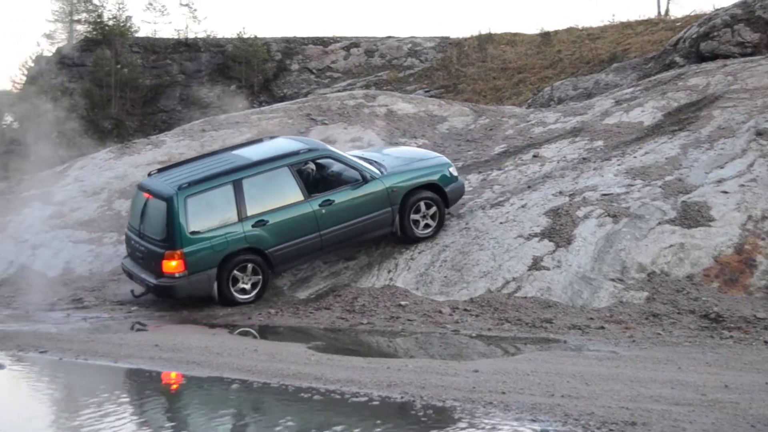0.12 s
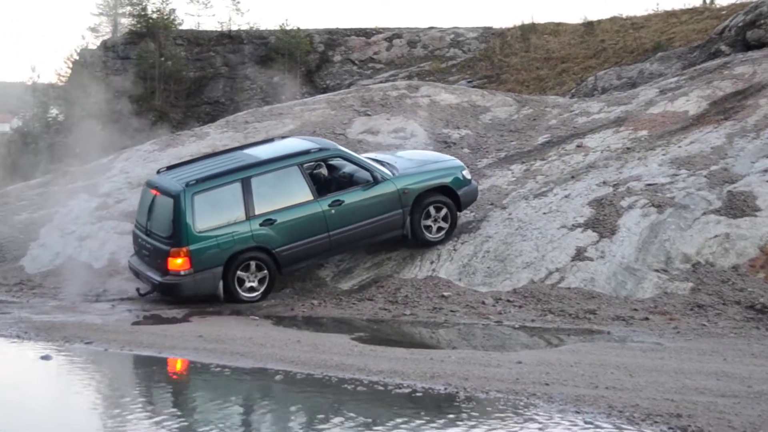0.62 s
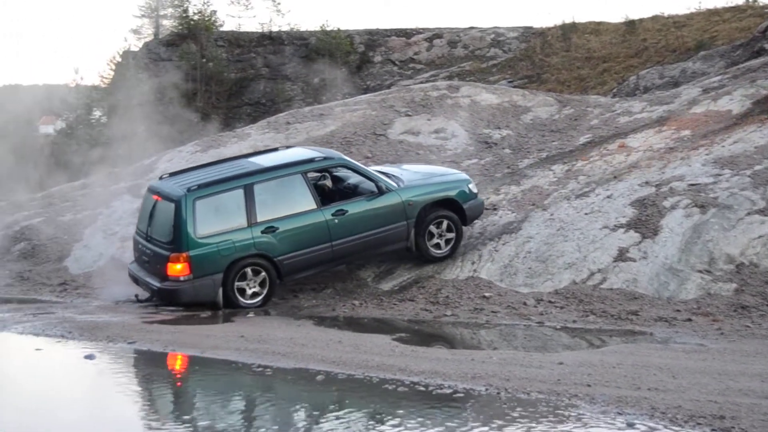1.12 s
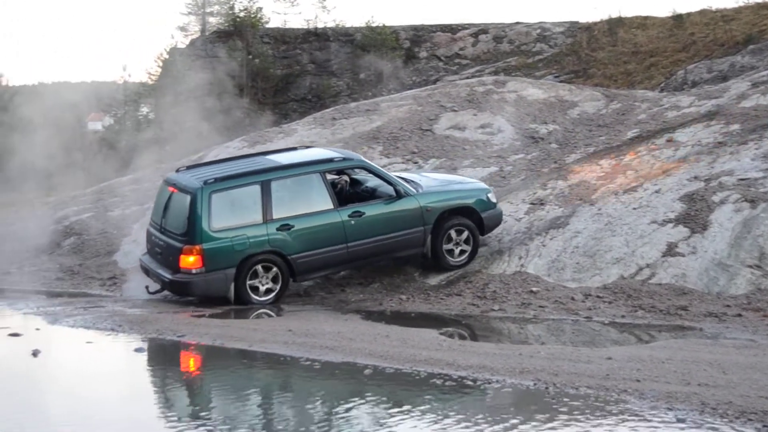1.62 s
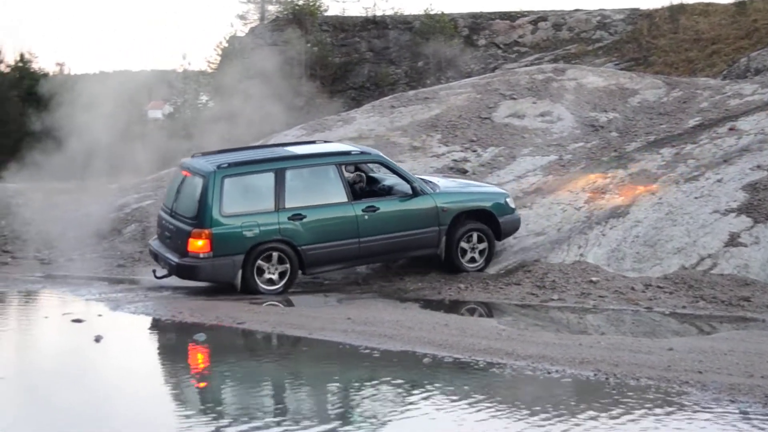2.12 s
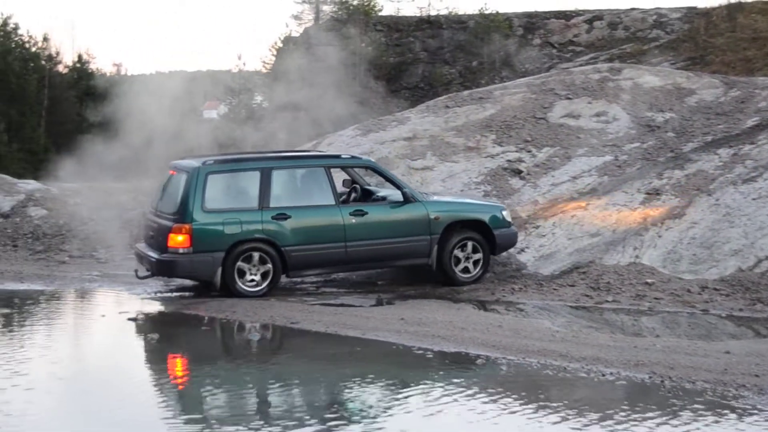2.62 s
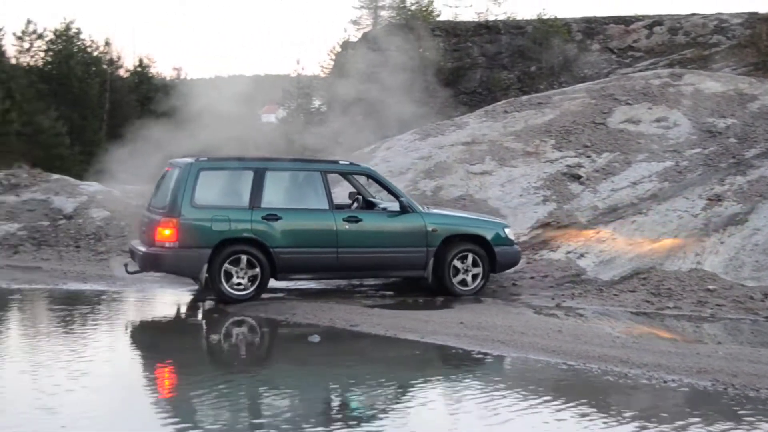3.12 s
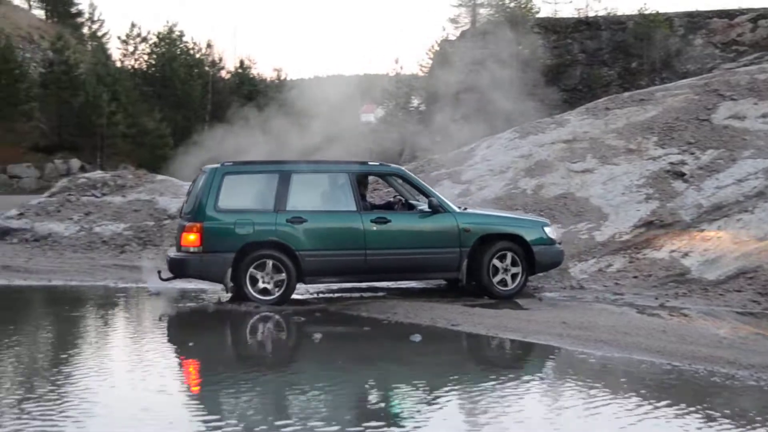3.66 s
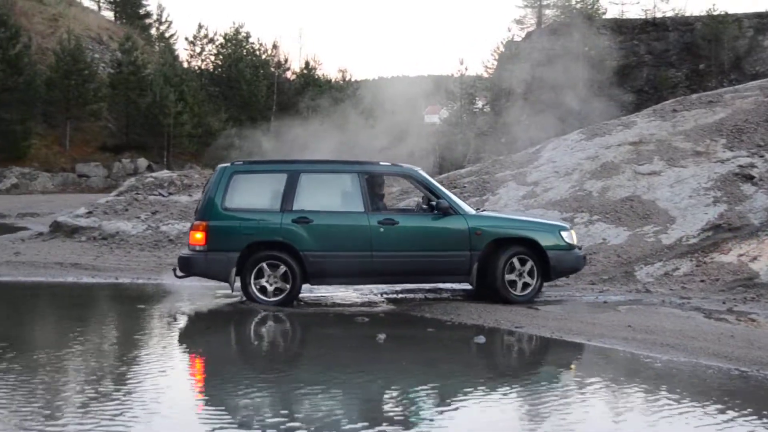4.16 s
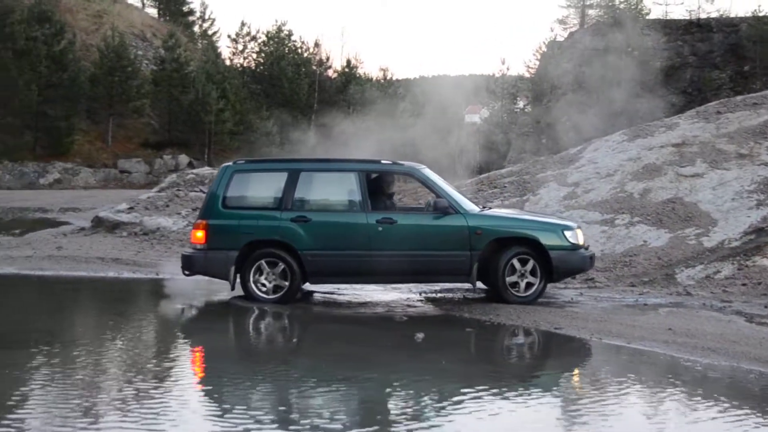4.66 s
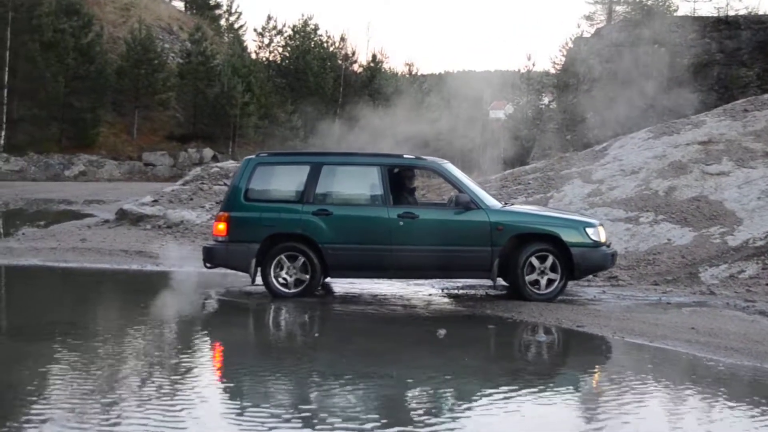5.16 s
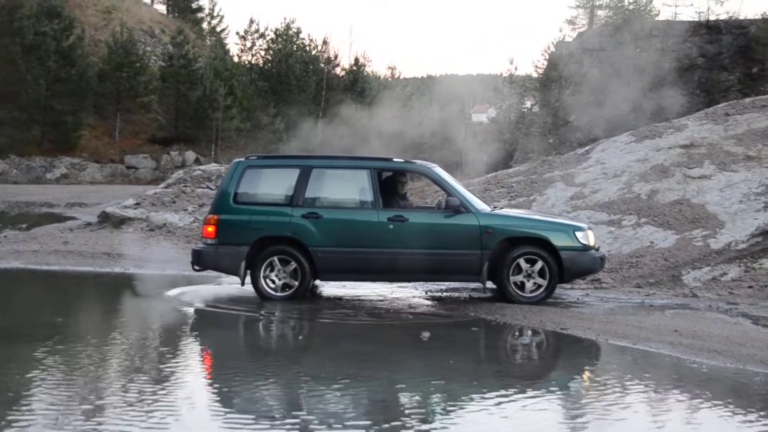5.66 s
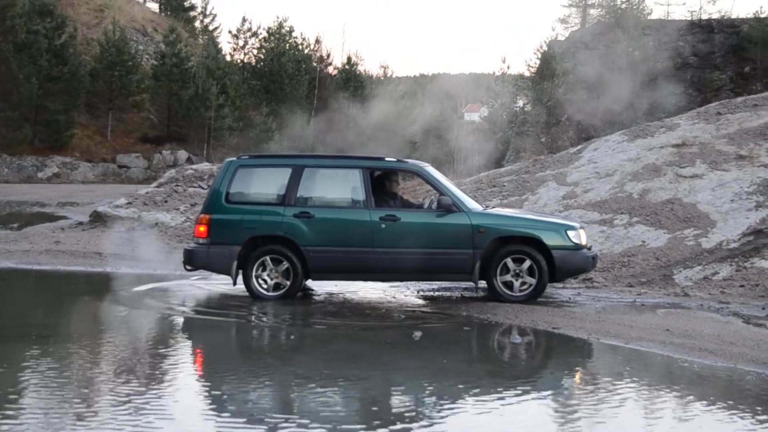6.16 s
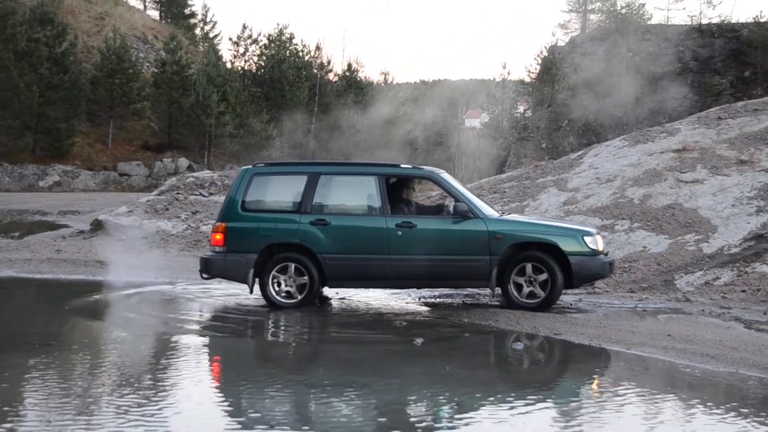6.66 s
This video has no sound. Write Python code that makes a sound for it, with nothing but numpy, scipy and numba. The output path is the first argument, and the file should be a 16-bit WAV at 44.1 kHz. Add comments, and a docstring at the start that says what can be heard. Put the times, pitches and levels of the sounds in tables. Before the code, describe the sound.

A car slides off a rock slope with rasping grit and popping stones, rolls quietly over wet gravel, and finally its engine climbs in pitch.

```python
"""Rock slope and wet gravel: a car slides off with locked wheels and rolls on over the gravel; its engine revs up.
Random contacts feed stone crunch, grit scrape and sand hiss; damped rings make snapping stones, ticks and bumps.
The engine sums exhaust tones, pipe noise, block clatter and gear whine; a panel drones early in the revs.
A rock face adds a short noise-tail echo; a small microphone narrows the band."""
import sys
import numpy as np
from scipy import signal
from scipy.fft import rfft, irfft
from scipy.io import wavfile
from scipy.ndimage import uniform_filter1d
from numba import njit

SR = 44100
rng = np.random.default_rng(int(sys.argv[2]) if len(sys.argv) > 2 else 0)


def pcm_store(signal):
    """Save signal as 16-bit PCM."""
    levels = np.round(np.clip(np.atleast_2d(signal), -1, 1) * 32767)
    wavfile.write(sys.argv[1], SR, levels.astype(np.int16).T)


def amplitude_ratio(level_db):
    """Convert a level in decibels to the matching linear amplitude (field) ratio."""
    exponent = np.asarray(level_db, float) / 20
    return 10 ** exponent


N = 298998

# tyres rolling over gravel; coarseness = stones over scraping grit: [t/s, level/dB, coarseness/dB]
ROLLING = [(0, -40, 14.5), (0.4, -41.5, 1), (0.64, -40, 0), (0.77, -38, -4.5), (1.45, -46, 6.5),
           (1.55, -46, -1.5), (1.72, -48, 1.5), (1.82, -49.5, 0), (2.1, -48.5, 2.5), (2.43, -45.5, -0.5),
           (2.55, -45, 2.5), (2.7, -41, -2.5), (2.87, -45, -4), (3.21, -44.5, -1.5), (3.36, -45.5, -2.5),
           (3.98, -46.5, 0), (4.12, -48, -6), (4.2, -53, 2), (4.5, -53, -1), (4.66, -46.5, -6),
           (4.8, -51, -3.5), (4.93, -54.5, -5.5), (5.12, -59.5, -0.5), (5.3, -52, -14), (5.49, -53.5, -5),
           (5.65, -54.5, -4), (5.89, -55, 1.5), (6.18, -47, -3), (6.42, -45.5, 0), (6.78, -46.5, -2)]
# locked-wheel slides, one table each: [t/s, level/dB, coarseness/dB, sand spray/dB, scrape f/Hz]
SLIDES = [
    [(0, -25, 6.5, 1, 1870), (0.02, -28, 10.5, 0.5, 1820), (0.04, -23.5, 8.5, -6, 1950),
     (0.052, -26.5, 4.5, -8, 1900), (0.06, -31, 14, 1, 1830), (0.075, -31.5, 11.5, 2.5, 1870),
     (0.115, -28.5, 7.5, -1, 1700), (0.15, -28.5, 8, -0.5, 1800), (0.195, -32, 5.5, 4.5, 2060),
     (0.212, -44, 4, 0, 2050), (0.225, -50, -1, -7, 2050)],
    [(0.78, -40.5, -4, -3.5, 2210), (0.83, -25.5, 1, 2, 2150), (0.87, -28, -0.5, 2, 2540),
     (0.94, -28.5, -2.5, 0.5, 2580), (1.0, -26.5, -1.5, -2, 2600), (1.15, -30.5, 0.5, 1, 2800),
     (1.23, -34, 6, 5, 3030), (1.275, -33.5, 7.5, 2.5, 3040), (1.305, -34, 3.5, 4.5, 3120),
     (1.35, -32, 1.5, 3, 3140), (1.375, -37, -4, 3, 2970), (1.392, -62, -2, 3, 2700)],
]
# short patches of loose ground: [t/s, level/dB, length/s, coarseness/dB, sand spray/dB]
LOOSE_PATCHES = [(0.272, -37, 0.04, 0, -3), (0.474, -45.5, 0.085, 7, 8), (0.656, -41.5, 0.086, -2, -0.5),
                 (1.472, -44, 0.09, -12, 1.5), (1.727, -50, 0.06, 5.5, 4.5), (1.924, -45.5, 0.066, 5, 5),
                 (2.067, -46, 0.0095, -1, 2), (2.447, -60, 0.26, -3, 13), (2.553, -45, 0.11, 0.5, 5),
                 (3.3, -53.5, 0.036, 0, 13), (3.722, -50.5, 0.17, -16, 2.5), (4.054, -61, 0.031, 8, 16),
                 (5.28, -57, 0.1, -15, -14), (5.547, -50.5, 0.37, -3, -12), (5.59, -59, .05, -1, -18),
                 (5.862, -51, 0.37, -19, -19), (6.193, -64, 0.07, 0, 2)]
# spectra of stones, of sand, and of body and road: [f/Hz, density/dB per Hz]
CRUNCH_COLOUR = [(200, -37), (430, -17), (540, -8), (630, -12.5), (780, -1.5), (1000, 0), (1200, -3),
                 (1500, -7), (2500, -19), (6000, -49)]
SAND_COLOUR = [(800, -29.5), (2000, -7), (3300, 4), (4000, 7), (6000, 1.5), (12000, -4)]
RUMBLE_COLOUR = [(15, -62), (25, -29), (54, -14), (90, -13.5), (150, -4.5), (236, 0.5), (312, 0.5),
                 (418, -6.5), (700, -9), (910, -54), (1540, -120)]
# mean engine speed: [t/s, firing rate/Hz]
FIRING_RATE = [(0, 25), (5.95, 24), (6.05, 31.7), (6.164, 40.4), (6.23, 45.4), (6.362, 55.7), (6.404, 58.9),
               (6.508, 65.0), (6.62, 68.5), (6.78, 70.3)]
# engine load: [t/s, load/0 idle to 1 full]
LOAD = [(0, 0), (1.5, 0), (4.0, 0.2), (4.6, 0.41), (5.95, 0.51), (6.1, 0.69), (6.2, 0.98), (6.27, 0.85),
        (6.38, 0.99), (6.46, 0.95), (6.52, 0.77), (6.7, 0.83), (6.78, 0.91)]
# unequal exhaust branches, one per cylinder: [level/dB]
CYLINDER_DB = [2.5, -1.5, 1, -0.5]
# clean exhaust tones: [multiple of firing rate, level/dB]
EXHAUST_TONES = [(1, 6), (2, 4), (1.5, -8), (2.5, -18), (3, 1.5), (3.5, -3), (4, 0.5), (4.25, -2.5),
                 (5, -1.5), (6, -3), (7, -2), (8, -2), (9, -5.5), (10, -5.5), (11, -7.5)]
# exhaust pipe resonances: [f/Hz, width/Hz, level/dB]
PIPE_MODES = [(232, 30, -2), (299, 53, -5.5), (332, 20, -4), (590, 42, -6.5)]
# block clatter spectrum: [f/Hz, density/dB per Hz]
CLATTER_COLOUR = [(300, -20), (500, -12), (900, -6), (1500, -23), (2500, -7), (4000, 2), (9000, -24)]
# engine block and cover resonances: [f/Hz, width/Hz, level/dB]
BLOCK_MODES = [(870, 18, 0), (1250, 30, 4), (1477, 22, 7), (2450, 110, 2.5)]
# gear whine: [multiple of firing rate, level/dB]
WHINE_TONES = [(12, -2), (13.1, 0), (22.1, -7)]
# stones snapping out from under the tread: [t/s, level/dB, ring f/Hz, crack over ring/dB]
STONES = [(0.2432, -23, 1070, 3), (0.25, -26, 1050, -10), (0.266, -32, 1050, 12), (0.284, -22, 1060, 1),
          (0.353, -23, 770, 7.5), (0.369, -25, 930, 7), (0.453, -27, 1050, 10), (0.4538, -36, 1090, -2),
          (0.464, -22.5, 965, -2), (0.4674, -16, 776, 6.5), (0.4705, -33, 805, 6), (0.5193, -22, 970, 2.5),
          (0.631, -23, 960, -10), (0.683, -20, 900, -13), (1.409, -36, 1050, 10), (1.435, -21.5, 723, -11),
          (1.4395, -30, 800, -12), (1.4461, -31, 1150, 8), (1.448, -26.5, 1500, 11), (1.459, -28, 636, 0),
          (1.452, -32, 616, 8), (1.464, -33, 640, -6), (1.48, -30, 856, -2), (1.495, -32, 616, 0),
          (1.572, -32, 730, -7), (1.582, -35, 1110, -5), (1.591, -31, 610, -9), (1.915, -33, 970, 4),
          (1.945, -23.5, 906, -3), (2.183, -30.5, 1140, 3), (2.291, -28.5, 910, -12),
          (2.378, -30.5, 926, -10), (2.5354, -37, 1030, 8), (2.5516, -34, 1010, 14), (2.5885, -22, 960, 1),
          (2.6482, -26, 960, 2.5), (2.6827, -19, 996, -25), (2.689, -30, 1000, -18),
          (2.691, -23.5, 930, -18), (2.717, -21.5, 930, -10), (2.733, -27, 940, -10),
          (2.7586, -30, 1060, 5), (2.762, -30, 960, -12), (2.773, -34, 1290, 8), (2.9133, -48, 990, 6),
          (3.0031, -47, 1000, 7), (2.962, -32, 940, -14), (3.046, -29, 920, -14), (3.148, -29, 980, -7),
          (3.1699, -22, 930, -3), (3.187, -25, 970, -3), (3.213, -32, 1000, -10), (3.28, -31.5, 1030, -8),
          (3.452, -27.5, 975, -13), (3.535, -32.5, 1010, 3), (3.578, -32, 1010, -10),
          (3.9, -43, 1140, 16.5), (3.966, -39, 1050, 7), (4.081, -40, 940, -8), (4.1172, -43, 1150, 18),
          (4.322, -33.5, 1150, -5), (4.236, -40, 920, -5), (4.99, -47, 1000, -5), (4.998, -41, 800, -12),
          (5.012, -47, 800, -12), (5.032, -48, 1050, 3), (5.044, -51, 800, -12), (5.395, -48, 1110, 17),
          (5.47, -37, 1100, 4), (5.508, -41, 950, -6), (5.536, -41, 1160, -6), (5.561, -49, 1100, 6),
          (5.569, -46, 1310, 11), (5.574, -45, 1250, 2), (5.577, -46, 1300, 13), (5.601, -44, 1110, 11),
          (5.825, -48, 990, -10), (5.861, -36, 1090, 2), (5.869, -44, 1050, 0), (5.937, -43, 1020, 11)]
# grit ticking off: [t/s, level/dB, f/Hz]
TICKS = [(0.2473, -26.5, 8240), (0.4294, -23, 8250), (1.089, -9, 3380), (1.437, -28, 3130),
         (1.8377, -30, 7600), (1.8625, -29.5, 7100), (2.06, -34, 3250), (2.5356, -19, 5870),
         (2.536, -26, 7400), (2.5513, -17, 5400), (2.589, -25, 7550), (2.6094, -31, 8200),
         (2.631, -27, 3600), (2.6474, -34, 7330), (3.045, -32, 7250), (3.186, -26, 4270),
         (3.236, -37, 7000), (3.277, -24, 3270), (3.281, -26, 3200), (3.324, -31, 8350),
         (3.3613, -29, 4780), (3.5349, -29, 4880), (3.54, -28, 6500), (3.605, -32, 3240),
         (3.635, -31, 2500), (3.6735, -30, 6870), (3.899, -33, 3220), (4.3944, -43, 3260),
         (5.026, -33, 3700), (5.867, -36, 3300), (5.87, -33, 3000)]
# dull bumps of the body on its springs: [t/s, level/dB, f/Hz, t60/s]
BUMPS = [(0.35, -27, 235, 0.075), (1.449, -25.5, 502, 0.1), (1.49, -31, 274, 0.068), (1.471, -33, 232, .1),
         (1.525, -31, 253, 0.12), (1.59, -40, 251, .1), (1.644, -40, 240, .1), (1.94, -32, 258, .1),
         (2.584, -35, 234, .1), (4.245, -36, 350, 0.082), (4.308, -32, 312, 0.072),
         (4.9857, -30, 230, 0.054), (5.003, -39, 260, 0.045), (5.035, -29, 202, 0.066)]
# hard stone on stone: [t/s, level/dB, f/Hz]
CLACKS = [(0.4672, -14, 1900), (1.4452, -13, 1250), (1.4487, -18, 2000), (2.714, -23, 2200),
          (2.7175, -22, 2600), (2.7433, -11, 2800), (2.7574, -15, 1700), (3.363, -25, 3500),
          (3.605, -17, 4000), (4.117, -26, 1900), (0.52, -17, 1700), (5.842, -32, 2300),
          (5.8452, -31, 2500), (5.8545, -31, 1700), (5.8602, -12, 1920), (5.8617, -22, 1600),
          (5.8633, -22, 1500)]
# panel drone: [t/s, f/Hz, level/dB]
PANEL_DRONE = [(6.05, 340, -75), (6.09, 341, -53), (6.2, 343, -50), (6.27, 346, -52), (6.31, 346, -48),
               (6.34, 338, -56), (6.37, 335, -45), (6.392, 340, -62), (6.41, 350, -51), (6.435, 345, -56),
               (6.455, 322, -44), (6.48, 318, -66), (6.52, 335, -61), (6.6, 338, -66), (6.7, 345, -61),
               (6.78, 348, -68)]
# microphone response: [f/Hz, gain/dB]
MIC_RESPONSE = [(20, 3), (50, -6.5), (100, -1.5), (200, -2), (3400, 1.5), (3750, -3.5), (6000, 2),
                (7400, 6.5), (7950, 3.5), (8300, 6), (8800, 0.5), (9600, -10.5), (10300, -10),
                (11000, -19.5), (11500, -29), (11800, -101)]

# engine parts: (idle level/dB, rise at full load/dB, rise per octave of speed/dB)
PIPE_LEVEL, TONES_LEVEL = (-74.5, 19, -4), (-75, 21, 3)
CLATTER_LEVEL, WHINE_LEVEL, SHAKE_LEVEL = (-59.5, 4, 2.9), (-89, 11, 21), (-71, 5, 5)


def unit(x):
    """Scale to rms 1."""
    return x / np.sqrt(np.mean(x ** 2))


def fixed(hz):
    """A constant frequency, one value per sample."""
    return np.full(N, float(hz))


def curves(table):
    """Columns of a table, interpolated to one value per sample."""
    s, *columns = np.transpose(table)
    return [np.interp(np.arange(N) / SR, s, c) for c in columns]


def colour(x, points, size=2048):
    """Causal filter through (Hz, dB) points, from the cepstrum of the log gain."""
    hz, db = np.transpose(points)
    bin_hz = np.arange(size // 2 + 1) * SR / size
    log_gain = np.interp(np.log(bin_hz + 1), np.log(hz), db) * np.log(10) / 20
    cep = irfft(log_gain)
    cep[1:size // 2] *= 2  # fold onto positive time
    cep[size // 2 + 1:] = 0
    return signal.fftconvolve(x, irfft(np.exp(rfft(cep))))[:len(x)]


@njit
def svf(x, hz, width):
    """State-variable band-pass whose centre may move."""
    y, b, l = np.empty(len(x)), 0., 0.
    for i in range(len(x)):
        g, k = np.tan(np.pi * hz[i] / SR), width / hz[i]
        v = (b + g * (x[i] - l)) / (1 + g * (g + k))
        b, l, y[i] = 2 * v - b, l + 2 * g * v, k * v
    return y


def resonate(x, modes):
    """Steep fixed resonances side by side, each two band-passes in series."""
    total = 0
    for hz, width_hz, db in modes:
        once = svf(x, fixed(hz), 2.0 * width_hz)
        total = total + amplitude_ratio(db) * svf(once, fixed(hz), 2.0 * width_hz)
    return unit(total)


def walk(rate_hz):
    """Random levels held 1 / rate and slewed twice."""
    k = int(SR / rate_hz)
    held = np.repeat(rng.standard_normal(N // k + 1), k)
    return uniform_filter1d(uniform_filter1d(held, k), k)[:N]


def grains(per_s, spread_db, wash):
    """Clicks at random moments, a few much larger than most, over smooth noise."""
    hit, sign, size = rng.random(N), rng.standard_normal(N), rng.exponential(size=N)
    clicks = (hit < per_s / SR) * np.sign(sign) * amplitude_ratio(spread_db * np.minimum(size, 3.5))
    return unit(unit(clicks) + wash * rng.standard_normal(N))


def ring(s, db, hz, t60_s, length, rough=0., attack_s=1e-6):
    """Damped sines at the given moments; rough blends in noise."""
    out, t = np.zeros(N + length), np.arange(length) / SR
    noise = rng.standard_normal((len(s), length))
    for at, level_db, ring_hz, fade_s, hiss in zip(s, db, hz, t60_s * np.ones(len(s)), noise):
        wave = (1 - rough) * np.sin(2 * np.pi * ring_hz * t) + rough * hiss
        envelope = np.exp(-np.log(1000) * t / fade_s) * (1 - np.exp(-t / attack_s))
        out[int(at * SR):][:length] += amplitude_ratio(level_db) * wave * envelope
    return out[:N]


def engine_db(part):
    """Level of an engine part from load and speed."""
    idle_db, load_db, speed_db = part
    octaves = np.log2(curves(FIRING_RATE)[0] / FIRING_RATE[0][1])
    return idle_db + load_db * curves(LOAD)[0] + speed_db * octaves


def contact(level_db, coarse_db, spray_db=0.):
    """Powers of stones, grit and sand; sand fades where the ground is coarse."""
    return amplitude_ratio([level_db + coarse_db, level_db, level_db - 0.13 * coarse_db + spray_db]) ** 2


def ground():
    """Contact gains, scrape and hiss pitches and sliding flag from rolling, slides and loose patches."""
    t = np.arange(N) / SR
    power, sliding = contact(*curves(ROLLING)), np.zeros(N)
    scrape_hz, hiss_hz = 2150 * (1 + 0.015 * walk(3.9)), 7240 * (1 + 0.34 * walk(21))  # rolling
    for slide in SLIDES:
        *levels, hz = curves(slide)
        on = (t >= slide[0][0]) & (t < slide[-1][0])
        power = power + on * contact(*levels)
        scrape_hz = np.where(on, hz, scrape_hz)
        hiss_hz = np.where(on, 2.34 * hz, hiss_hz)
        sliding = sliding + on
    for s, level_db, length_s, *levels in LOOSE_PATCHES:
        power = power + contact(level_db, *levels)[:, None] * np.exp(-(2 * (t - s) / length_s) ** 2)
    return np.sqrt(power), scrape_hz, hiss_hz, sliding


def crunch(shared, sliding):
    """Stone contacts, plus lone pebbles ringing the tyre while it rolls."""
    stones = colour(grains(900., 2.9, 0.86) + .5 * shared, CRUNCH_COLOUR)
    tyre_hz = 964.0 * (1 + 0.16 * walk(60))
    pebbles = svf(svf(grains(300., 3.6, 0.), tyre_hz, 450.0), tyre_hz, 450.0)
    return unit(unit(stones) + 0.43 * (1 - sliding) * unit(pebbles))


def scrape(shared, scrape_hz, sliding):
    """Grit contacts through a moving broad band and fixed resonances; sliding sharpens it."""
    grit = grains(1500., 4.0, 0.75) + 0.75 * shared
    broad = svf(svf(grit, scrape_hz, 2200.0), scrape_hz, 2330.0)
    narrow = 0.41 * sliding * svf(grit, scrape_hz, 580.0)
    low = 0.51 * svf(grit, fixed(1800), 340.0)
    high = (0.47 + 0.26 * sliding) * svf(grit, fixed(3250), 600.0)
    return unit(broad + narrow + low + high)


def sand_hiss(shared, hiss_hz, sliding):
    """Dense fine contacts with a moving band, much stronger in a slide."""
    sand = colour(grains(3000., 2.9, 0.74) + 0.77 * shared, SAND_COLOUR)
    return unit(sand + (0.037 + 0.71 * sliding) * svf(sand, hiss_hz, 1500.0))


def rumble(crunch_gain):
    """Low noise of body and road, shaken by stones, engine and the drop onto level ground."""
    settle_s, settle_db, settle_t60_s = 1.44, -53, 1
    t = np.arange(N) / SR
    settle = (t > settle_s) * amplitude_ratio(settle_db - 60 * np.abs(t - settle_s) / settle_t60_s)
    gain = amplitude_ratio(-70) + amplitude_ratio(-19) * crunch_gain + settle + amplitude_ratio(engine_db(SHAKE_LEVEL))
    return gain * unit(colour(rng.standard_normal(N), RUMBLE_COLOUR, size=8192))


def gravel():
    """One patchy stream of contacts shared by crunch, scrape and hiss; the body rumbles along."""
    (crunch_gain, grit_gain, sand_gain), scrape_hz, hiss_hz, sliding = ground()
    patch, loose = walk(60), 1 - 0.62 * sliding  # a sliding tyre scrubs more evenly
    shared = grains(900., 5.2, 0.6)
    crunch_gain_patchy = crunch_gain * amplitude_ratio(loose * (2.25 * patch + 1.44 * walk(24.76)))
    grit_gain = grit_gain * amplitude_ratio(0.71 * patch + 0.13 * walk(23.0))
    sand_gain = sand_gain * amplitude_ratio(loose * (1.98 * patch + 0.69 * walk(10)))
    return (crunch_gain_patchy * crunch(shared, sliding)
            + grit_gain * scrape(shared, scrape_hz, sliding)
            + sand_gain * sand_hiss(shared, hiss_hz, sliding)
            + rumble(crunch_gain))


def exhaust_tones(hz, turns):
    """Multiples of the firing rate, weak at low pitch, lifted as they pass the tailpipe resonance."""
    tones = 0
    for k, db in EXHAUST_TONES:
        radiated = 1 / np.hypot(1, (100 / (k * hz)) ** 2)  # the tailpipe radiates little under 100 Hz
        wave = np.sin(2 * np.pi * round(4 * k) / 4 * turns)
        tones = tones + amplitude_ratio(db + 0.74 * walk(15)) * radiated * wave
    tones = tones + 0.6 * svf(tones, fixed(300), 60.0)
    return colour(tones, [(20, -6.5), (380, -2.5), (480, -22.0), (9000, -11)])


def exhaust_pipe(size, phase, blow):
    """Pulsing gas noise and the blow of each firing ring the pipe."""
    gas = size * (1.3 + np.exp(-phase / 0.21)) * rng.standard_normal(N)
    return resonate(gas + 25.0 * blow, PIPE_MODES)


def block_clatter(size, phase, blow):
    """Noise pulsing with each firing, plus ringing of block and covers."""
    noise = size * (0.88 + np.exp(-phase / 0.32)) * rng.standard_normal(N)
    ringing = resonate(noise + 10.0 * blow, BLOCK_MODES)
    return unit(unit(colour(noise, CLATTER_COLOUR)) + 0.9 * ringing)


def gear_whine(turns):
    """High multiples of the firing rate, each wavering in level."""
    return unit(sum(amplitude_ratio(db + 3.0 * walk(8)) * np.sin(2 * np.pi * k * turns) for k, db in WHINE_TONES))


def engine():
    """Four unequal cylinders drive exhaust tones, pipe, clatter and whine from one firing phase."""
    hz, = curves(FIRING_RATE)
    turns = np.cumsum(hz * (1 + 0.0046 * walk(30))) / SR  # firings so far
    count = turns.astype(int)
    phase = turns - count
    scatter_db = 1.4 * rng.standard_normal(count[-1] + 1)[count]
    size = amplitude_ratio(np.array(CYLINDER_DB)[count % 4] + scatter_db)
    # each blow stands out of the gas only above 27 firings/s
    blow = size * (np.diff(count, prepend=0) > 0) * np.clip(hz - 27., 0, 20) / np.sqrt(hz)
    whine_db = engine_db(WHINE_LEVEL) + 0.9 * walk(14)  # comes and goes
    return (amplitude_ratio(engine_db(PIPE_LEVEL)) * exhaust_pipe(size, phase, blow)
            + amplitude_ratio(engine_db(TONES_LEVEL)) * exhaust_tones(hz, turns)
            + amplitude_ratio(engine_db(CLATTER_LEVEL)) * block_clatter(size, phase, blow)
            + amplitude_ratio(whine_db) * gear_whine(turns))


def rock_face(x):
    """Scattered echo off the rock: decaying noise after a 4 ms gap."""
    t60_s, level_db, gap_s = 0.22, -14, .004
    t = np.arange(int(.4 * SR)) / SR
    tail = rng.standard_normal(len(t)) * np.exp(-np.log(1000) * t / t60_s) * (t > gap_s)
    return amplitude_ratio(level_db) * signal.fftconvolve(x, tail / np.sqrt(np.sum(tail ** 2)))[:N]


def snapping_stones():
    """Each stone rings the tyre briefly, cracks and sheds splinters."""
    crack_hz = 1760
    s, db, hz, crack_db = np.transpose(STONES)
    thuds = ring(s, db, hz, .027, length=3000, attack_s=.00025)
    cracks = ring(s, db + crack_db, np.full(len(s), float(crack_hz)), 0.0064, length=600, rough=0.072)
    splinters = ring(s, db + crack_db - 8.0, hz, 0.032, length=2000, rough=1.0)
    return thuds + cracks + svf(splinters, fixed(crack_hz), 1900.0)


def grit_ticks():
    """Grit ticks off as very short high rings."""
    return ring(*np.transpose(TICKS), 0.0043, length=300)


def body_bumps():
    """Rough low rings of the body on its springs, band-passed twice."""
    bumps = ring(*np.transpose(BUMPS), length=6000, rough=0.64)
    return svf(svf(bumps, fixed(350), 990.0), fixed(400), 1400.0)


def stone_clacks():
    """Hard stone on stone: about one broad cycle, 60 dB down after 2.2 cycles."""
    s, db, hz = np.transpose(CLACKS)
    return ring(s, db, hz, 2.2 / hz, length=300, attack_s=.00008)


def snaps():
    """Stones, ticks and clacks without their lows, plus body bumps."""
    high_pass = signal.butter(4, 560., "high", fs=SR, output="sos")
    sharp = signal.sosfilt(high_pass, snapping_stones() + grit_ticks() + stone_clacks())
    return sharp + body_bumps()


def panel():
    """Sheet metal drones as a wavering sine, strongest early in the revs and weaker after."""
    hz, db = curves(PANEL_DRONE)
    on = np.arange(N) / SR > PANEL_DRONE[0][0]
    return on * amplitude_ratio(db) * np.sqrt(2) * np.sin(2 * np.pi * np.cumsum(hz) / SR)


def scene():
    """Tyres, stones, engine and panel with their echo."""
    car = gravel() + engine() + snaps() + panel()
    return (car + rock_face(car))[None]


def top_cut(x):
    """Nothing passes above the cut-off."""
    return signal.sosfilt(signal.butter(12, 11570, fs=SR, output="sos"), x)


def record(dry):
    """Small microphone: treble ripples, steep fall at the top, faint low noise of its own."""
    own_noise = amplitude_ratio(-93) * unit(svf(rng.standard_normal(N), fixed(25), 40.))
    mix = (colour(dry[0], MIC_RESPONSE, size=8192) + own_noise)[None]
    return top_cut(mix)


dry = scene()
out = record(dry)
pcm_store(out)
```